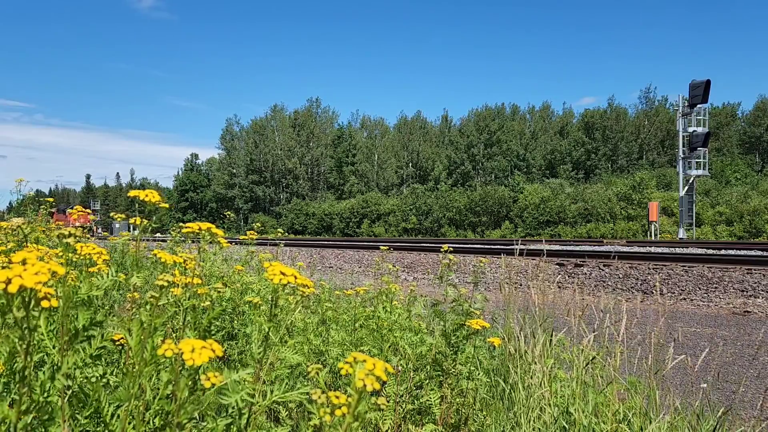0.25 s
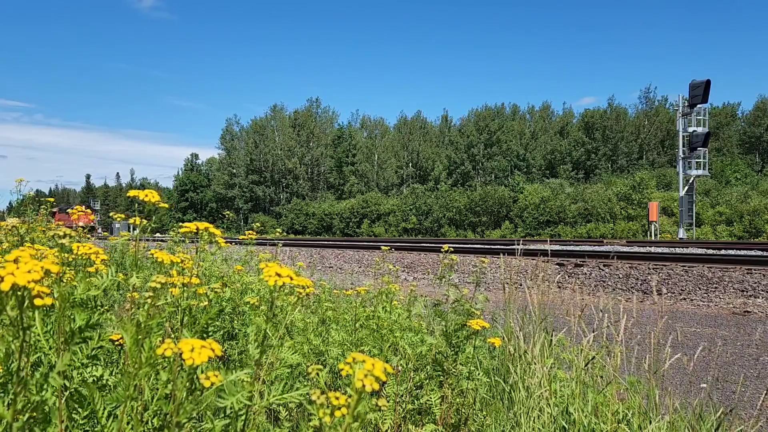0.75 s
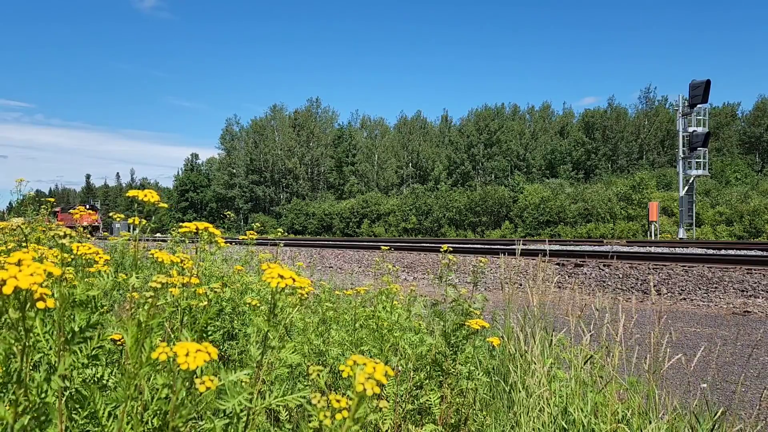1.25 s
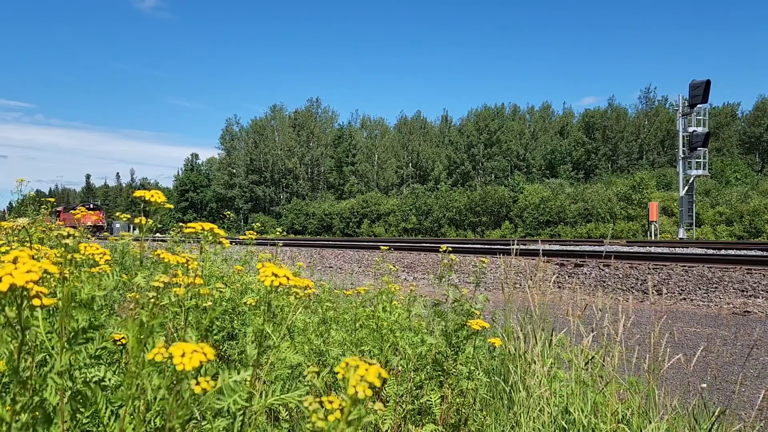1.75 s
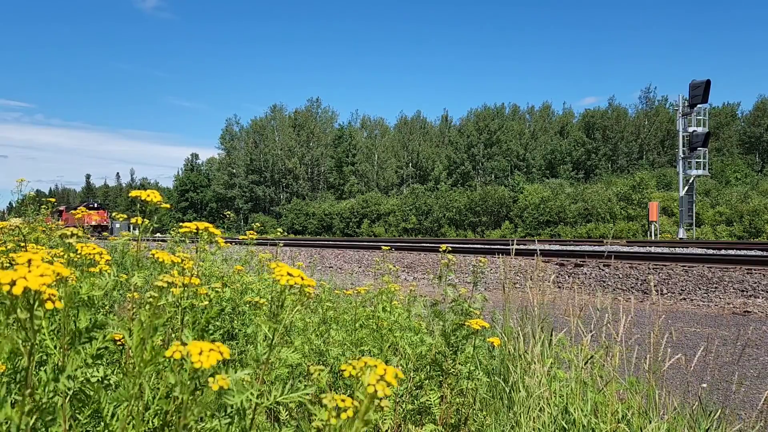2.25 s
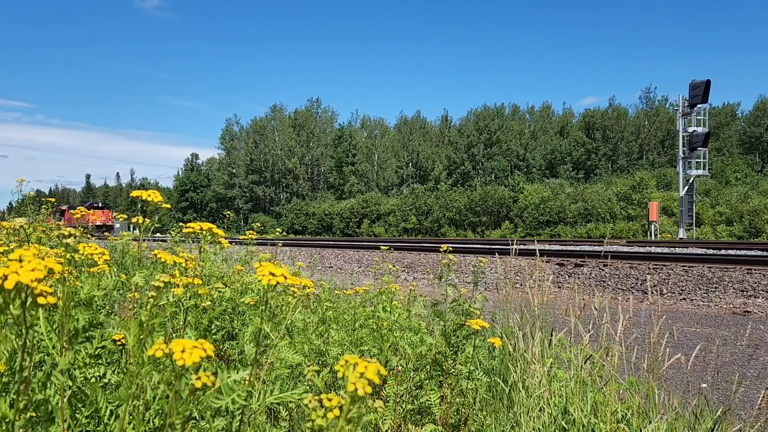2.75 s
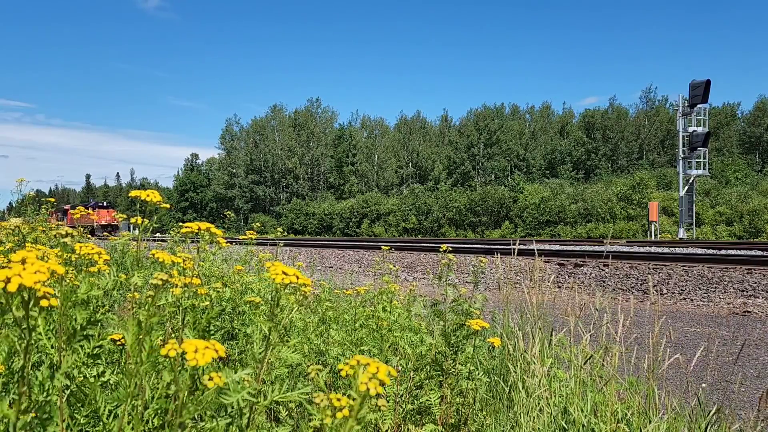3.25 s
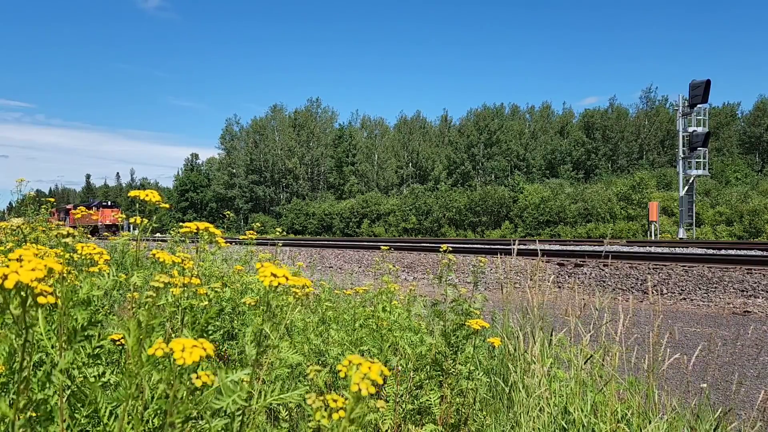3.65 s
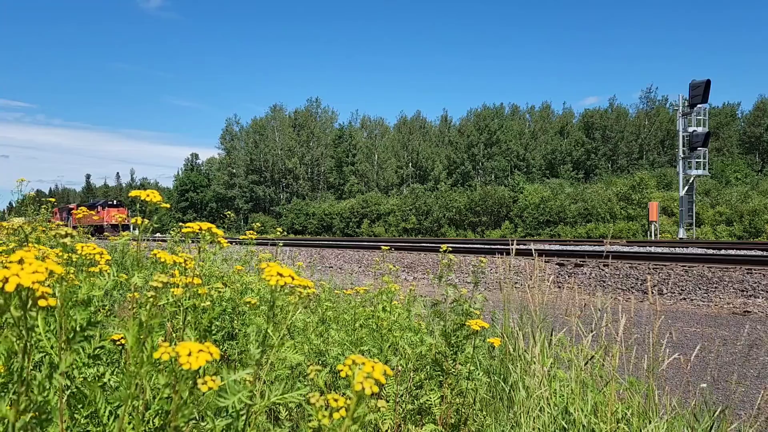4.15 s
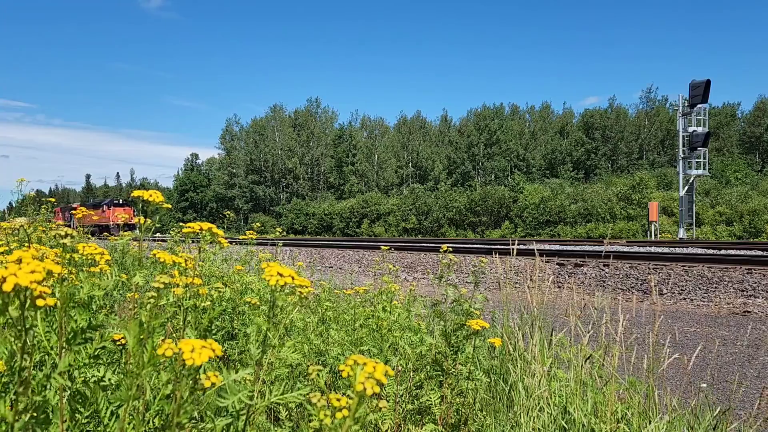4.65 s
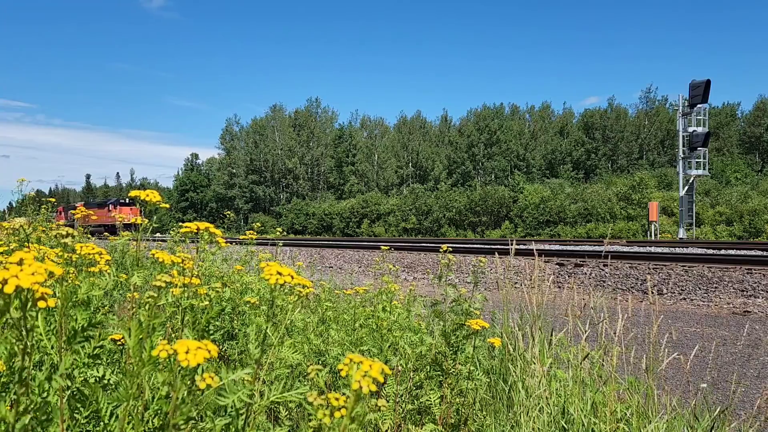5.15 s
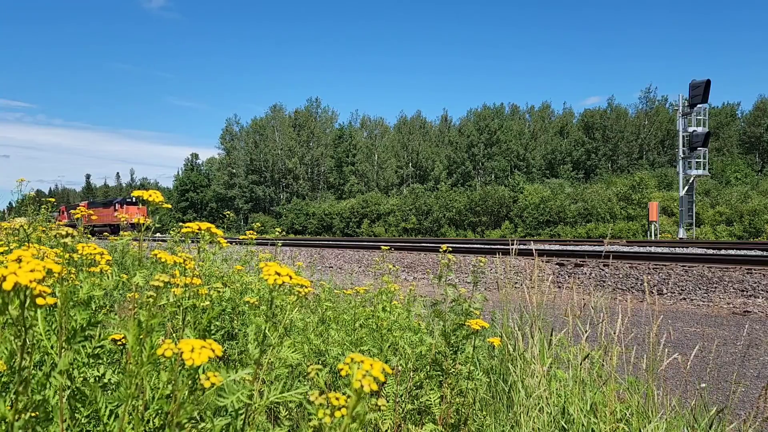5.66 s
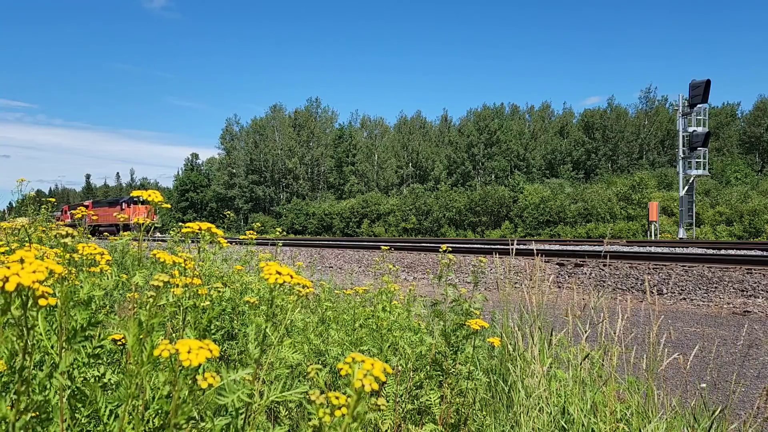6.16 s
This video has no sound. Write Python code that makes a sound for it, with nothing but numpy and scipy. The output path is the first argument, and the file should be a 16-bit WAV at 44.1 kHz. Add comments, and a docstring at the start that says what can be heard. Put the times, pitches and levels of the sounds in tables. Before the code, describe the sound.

A bell clangs steadily as a diesel freight train rumbles nearer across a buzzing insect meadow, then a loud sustained chord air horn blares.

```python
"""A bell rings and a chord air horn blows as a freight train draws near from the left across a summer meadow;
katydids buzz, crickets trill, and a wood beyond the track answers horn and bell.
Horn and bell are sums of partials that shimmer in warm air; two diesel locomotives are sums of crank orders
over coloured noise for wheels, rush and an air vent. Katydids are gated hiss, crickets short tones and
gated noise, and the wood's echo is a decaying noise tail."""
import sys
import numpy as np
from scipy import signal
from scipy.fft import rfft, irfft, next_fast_len
from scipy.io import wavfile
from scipy.ndimage import uniform_filter1d, map_coordinates

SR = 44100
rng = np.random.default_rng(int(sys.argv[2]) if len(sys.argv) > 2 else 0)


def gain_from_decibels(decibels):
    """Convert decibel values to linear amplitude factors."""
    exponent = np.asarray(decibels, float) / 20
    return 10 ** exponent


def file_out(sig):
    """Save sig as 16-bit WAV at sys.argv[1]."""
    # one column per channel
    cols = np.atleast_2d(sig).T
    # limit, then scale
    lim = np.clip(cols, -1, 1)
    pcm = np.round(lim * 32767).astype(np.int16)
    wavfile.write(sys.argv[1], SR, pcm)


N = 282240
T = np.arange(N) / SR


def unit(x):
    """Scaled to rms 1."""
    return x / np.sqrt(np.mean(x ** 2) + 1e-20)


def along(points, hz):
    """Interpolates (frequency [Hz], value) points on a log frequency axis."""
    f, v = np.transpose(points)
    return np.interp(np.log(hz + 1), np.log(f + 1), v)


def curves(rows):
    """One value per sample for each column after the time."""
    s, *cols = np.transpose(rows)
    return [np.interp(T, s, c) for c in cols]


def ramp(start, rise):
    """0 before start, 1 after the rise."""
    return np.clip((T - start) / rise, 0, 1)


def wobble(rate):
    """A smooth random curve, rate knots a second."""
    return map_coordinates(rng.standard_normal(int(N * rate / SR) + 4), [T * rate])


def filtered(x, response):
    """x times a complex response of frequency."""
    m = next_fast_len(N + 8192)
    return irfft(rfft(x, m) * response(np.fft.rfftfreq(m, 1 / SR)), m)[..., :N]


def noise(spectrum, alike):
    """Stereo noise of rms 1 whose channels share the power fraction alike."""
    common, *apart = rng.standard_normal((3, N))
    pair = np.sqrt(alike) * common + np.sqrt(1 - alike) * np.array(apart)
    return unit(filtered(pair, lambda hz: gain_from_decibels(along(spectrum, hz))))


def shimmer(x, low_db, high_db, own):
    """Eddies of warm air bend level and phase in drifting patches, more in the treble, partly apart at each port."""
    hz, _, z = signal.stft(x, SR, nperseg=1024)
    eddies = rng.standard_normal((2, 3) + z.shape)
    eddies = uniform_filter1d(eddies, size=7, axis=2)  # patches wide in frequency
    eddies = unit(uniform_filter1d(eddies, size=6, axis=3))  # and long in time
    bend, turn = eddies[:, :1] + own * eddies[:, 1:]
    depth = along([(300, low_db), (6000, high_db)], hz)[:, None] * np.log(10) / 20
    keep_power = depth ** 2 * (1 + own ** 2)
    bent = z * np.exp(depth * (bend + 1j * turn) - keep_power)
    return signal.istft(bent, SR, nperseg=1024)[1][:, :N]


def waver(pair, depth_s, rate):
    """The air path to each port stretches and shrinks on its own."""
    return np.array([map_coordinates(x, [(T + depth_s * wobble(rate)) * SR], mode="nearest") for x in pair])


def partials(phase, levels_db, onset):
    """A reed bell's harmonics, each swaying in level; the higher ones speak later in the onset."""
    tone = 0
    for k, db in enumerate(levels_db, 1):
        tone = tone + gain_from_decibels(db + 1.7 * wobble(9)) * onset ** (k - 1) * np.sin(k * phase)
    return tone


def brass(phase, pitch_hz, start_s):
    """The low bell's upper partials, with a brassy peak that moves in frequency."""
    # colour of the upper partials: (frequency [Hz], relative level [dB])
    colour = [(1650, 0), (2000, -3), (2300, -3.5), (2700, -8), (3300, -13), (4000, -15), (6000, -16),
              (7500, -10.5), (9000, -20), (11000, -27.5), (13000, -25)]
    # brassy peak: (time [s], centre [Hz], relative level of all upper partials [dB])
    glare = [(4.1, 4400, -2.5), (4.17, 4500, 1.5), (4.22, 4350, -1), (4.3, 4900, 1.5), (4.4, 4600, 0),
             (4.6, 4600, -1), (4.8, 5560, 2), (5.2, 5300, 0), (5.65, 5760, 2), (6.4, 5100, 1)]
    glare_hz, glare_db = curves(glare)
    scatter = rng.uniform(0, 2 * np.pi, 40)  # the long path over the ground shifts each partial
    tone = 0
    for k in range(5, 40):
        hz = k * pitch_hz
        peak_db = 5 * np.exp(-((hz - glare_hz) / 900) ** 2)
        tone = tone + gain_from_decibels(along(colour, hz) + peak_db) * np.sin(k * phase + scatter[k])
    return gain_from_decibels(-4.5 + glare_db) * tone * ramp(start_s, .09) ** 3


def sum_tones(low, mid, high):
    """The loud wave steepens, which adds tones at sums of the bells' pitches."""
    # high bell plus partials 1-6 of the low one: (relative level [dB])
    steepened = [-24.5, -19, -19, -23, -20, -26]
    tone = gain_from_decibels(-22.5) * np.sin(low + mid)
    for k, db in enumerate(steepened, 1):
        tone = tone + gain_from_decibels(db + wobble(7.9)) * np.sin(k * low + high)
    return tone


def squeaks():
    """Brief tones as the air arrives, each swelling and fading under half a sine."""
    # (start [s], length [s], frequency [Hz], relative level [dB])
    arrivals = [(3.969, 0.066, 568, -23.5), (3.977, 0.072, 770, -29)]
    tones = np.zeros(N)
    for s, length, hz, db in arrivals:
        swell = np.sin(np.pi * np.clip((T - s) / length, 0, 1))
        tones += gain_from_decibels(db) * swell * np.sin(2 * np.pi * hz * T)
    return tones


def horn():
    """Three strong reed bells and a weak one; the strong ones ride on each other's pressure, adding mixed tones."""
    # bells, low to high: (start [s], rise [s], settled pitch [Hz], excess at the start [Hz], relative level [dB])
    reed_bells = [(4.0, 0.04, 330.2, 15, -21), (3.98, 0.11, 465.5, 13, -25), (3.95, 0.091, 510.2, 5, -21)]
    # a fourth bell that barely speaks, same columns
    weak_bell = (4.03, .1, 736.5, 25.5, -40)
    # air pressure at the horn: (time [s], level [dB])
    air = [(4.0, -1.5), (4.3, -0.5), (4.6, 0.5), (4.9, -1), (5.3, 0.5), (5.7, -0.5), (6.0, -1.5), (6.4, -3)]
    # how far each bell yields to the others' pressure: (factor [1])
    rides = [1.5, .9, 0.7]
    # partials 1, 2, 3.. of each bell: (relative level [dB])
    low_partials = [-2, 1.5, -0.5, -2.5]
    mid_partials = [-0.5, -12.5, -9.5, -11, -18, -18, -56, -85, -23, -15]
    high_partials = [-0.5, -11.5, -13.5, -19, -28, -29.5, -41, -70, -43, -90]
    # the high bell wanders: (time [s], level [dB], left minus right [dB])
    high_drift = [(4.0, -3.5, 0), (4.5, -0.5, -5), (4.85, 0, 8), (5.15, -0.5, -13.5), (5.6, -2, -18),
                  (6.1, 4, -9.5), (6.4, 6.5, -2)]
    settle_s = .17  # time constant of the pitch sag as the air pressure settles

    start, rise, settled_hz, excess_hz, bell_db = np.transpose(reed_bells)[:, :, None]
    pitches = settled_hz + excess_hz * np.exp(-np.maximum(T - start[0], 0) / settle_s)
    flutter = 1 + .0011 * np.array([wobble(60) for _ in pitches])
    phases = 2 * np.pi * np.cumsum(pitches * flutter, 1) / SR

    # pressure of each bell, felt by the other two
    push = np.array([.8 * np.sin(phases[0]) + 1.6 * np.sin(2 * phases[0]),
                     .4 * np.sin(phases[1]),
                     .8 * np.sin(phases[2])])
    ride_s = 1.8e-5 * ramp(4, .3) * np.c_[rides] * (sum(push) - push)
    low, mid, high = phases + 2 * np.pi * pitches * ride_s

    onset = ramp(start, rise)
    strength = gain_from_decibels(bell_db + curves(air)[0]) * onset
    low_tone = partials(low, low_partials, ramp(start[0], .11) ** 0.57) + brass(low, pitches[0], start[0])
    centre = strength[0] * low_tone + strength[1] * partials(mid, mid_partials, onset[1])
    centre = centre + squeaks()
    centre = centre + strength[0] * ramp(start[0], 0.24) * sum_tones(low, mid, high)

    s, rise_s, hz, excess, db = weak_bell
    weak_hz = hz + excess * np.exp(-np.maximum(T - s, 0) / settle_s) + 2.5 * wobble(40)
    weak = 2 * np.pi * np.cumsum(weak_hz) / SR
    centre = centre + gain_from_decibels(db) * ramp(s, rise_s) * partials(weak, [0, -1, -8], 1)

    high_db, high_pan = curves(high_drift)
    high_tone = gain_from_decibels(high_db) * strength[2] * partials(high, high_partials, onset[2])
    breath = gain_from_decibels(-30) * centre * wobble(5000)  # air leaking past the reeds
    ports = gain_from_decibels(np.array([high_pan, -high_pan]) / 2)
    middle = shimmer(centre + breath, 0.96, 2.21, own=1.95)
    wandering = ports * shimmer(high_tone, 0.59, 2.3, own=1.93)
    return waver(np.sqrt(2) * (middle + wandering), 1.6e-5, 45)


def bell():
    """Each of the even strokes rings the bronze modes at new strengths, louder stroke by stroke."""
    # bell modes: (frequency [Hz], relative level [dB], time to fall 60 dB [s])
    bronze = [(824, -57, 3), (1432, -58, 2.5), (1631, -47.5, 4.5), (1782, -46, 4.5), (2896, -44, 2),
              (3682, -60, .9), (4242, -57, 1.6), (4330, -62, .9), (4800, -63, .6), (5706, -60, .7),
              (5790, -63, .6), (7187, -68, .4)]
    first_s, stroke_s = -.14, .7965
    first_db, grows_db = 1.5, 1  # gain of the first stroke, growth a stroke
    ring = np.zeros(N)
    for k in range(9):
        t = np.maximum(T - first_s - k * stroke_s, 0)
        bloom = 1 - np.exp(-t / .02)
        for hz, db, t60 in bronze:
            mode_db = first_db + k * grows_db + db + rng.normal(0, 1) - 60 * t / t60
            ring += gain_from_decibels(mode_db) * bloom * np.sin(2 * np.pi * hz * t)
    return waver(shimmer(ring, .7, 1.1, own=1.8), 6e-5, 60)


def engine(speed, throb, orders):
    """Uneven cylinders sound the orders around the sixteenth; they line up once a cycle, spread out by the exhaust,
    and turn over above the resonance of the stack."""
    start, tone, spread, stack = throb
    crank = start + np.cumsum(curves(speed)[0]) / SR
    sound = 0
    for k, db in orders.items():
        sway_db = .6 * wobble(1.5) + 1.1 * wobble(2) * np.array([[1], [-1]])
        turns = k * crank + tone + spread * (k - 16) ** 2 + (k > stack) / 2
        sound = sound + np.sqrt(2) * gain_from_decibels(db + sway_db) * np.cos(2 * np.pi * turns)
    return sound


def engines():
    """The lead locomotive steadily nears; the second swells as it clears the trees."""
    # crank speed: (time [s], speed [cycles/s])
    lead_speed = [(0, 5.075), (3.0, 5.075), (3.5, 5.088), (6.4, 5.087)]
    second_speed = [(0, 3.735), (3.0, 3.735), (3.8, 3.723), (6.4, 3.727)]
    # exhaust throb: (start [cycles], tone phase [turns], spread [turns], stack resonance [order])
    lead_throb = (-.015, .66, -.08, 18)
    second_throb = (.11, .07, -.17, 24)
    # orders of the crank cycle: (multiple [1], relative level [dB])
    lead_orders = {8: -4, 9: -16, 11: -10, 12: -11, 13: -14, 14: -14, 15: 2, 16: 0, 17: 1, 19: -6}
    second_orders = {8: -14, 13: -10, 14: -11, 15: 1, 16: 0, 17: -5, 19: -4, 29: -12}
    # lead engine: (level at 0 s [dB], growth [dB/s])
    lead_nears = (-33.5, 0.86)
    # second engine: (time [s], level [dB])
    second_clears = [(0, -68), (.8, -61), (1.4, -37), (2.0, -28.5), (2.6, -32), (6.4, -34.5)]
    lead = gain_from_decibels(nearing(lead_nears)) * engine(lead_speed, lead_throb, lead_orders)
    return lead + gain_from_decibels(curves(second_clears)[0]) * engine(second_speed, second_throb, second_orders)


def nearing(approach):
    """A level that grows evenly in dB as the train draws near."""
    db, db_per_s = approach
    return db + db_per_s * T


def wheels_and_rush():
    """The rumble of wheels and the rush of rails and fans: two swaying bands of noise."""
    # noise spectra: (frequency [Hz], relative density [dB])
    rumble = [(15, -41), (25, -45), (64, -4.5), (88, 2), (112, -11), (151, -17.5), (270, -27.5), (400, -53),
              (520, -68), (880, -120)]
    rush = [(150, -42), (250, -7), (380, -6), (830, -6), (1150, -14), (1600, -7.5), (2300, -15),
            (4000, -22), (6500, -25.5), (8600, -18.5), (10000, -26), (13000, -46)]
    # approach: (level at 0 s [dB], growth [dB/s])
    rumble_nears = (-33.5, 0.45)
    rush_nears = (-47, 0.81)
    rolling = gain_from_decibels(nearing(rumble_nears) + 1.2 * wobble(2.4)) * noise(rumble, .95)
    return rolling + gain_from_decibels(nearing(rush_nears) + 0.66 * wobble(6.03)) * noise(rush, 0.47)


def air_vent():
    """An air valve vents: a burst of hiss that holds, then falls away."""
    # hiss spectrum: (frequency [Hz], relative density [dB])
    vent = [(1200, -11), (2500, -4.5), (4000, -4), (6500, -7), (8500, -15)]
    start_s, rise_s, hold_s = 0.66, 0.022, 0.18  # the hold includes the rise
    fall_db = 66 * np.maximum(T - start_s - hold_s, 0)
    return gain_from_decibels(-42.5 - fall_db) * ramp(start_s, rise_s) * noise(vent, 0.4)


def train():
    """Two engines over the rumble and rush, with one vent of air."""
    return engines() + wheels_and_rush() + air_vent()


def katydids():
    """Wing strokes gate a very high hiss: a near insect on the left, a faster one, and a steady far chorus."""
    # katydid hiss spectrum: (frequency [Hz], relative level [dB])
    hiss = [(8000, -52), (9500, -20), (11000, -10), (12400, -3.5), (13100, 3), (14500, 4), (15300, 13),
            (16000, -23), (17000, 3)]
    pan = 10 + 0.96 * wobble(2.94)  # left minus right, dB

    def stroke(cycles, sharp):
        return np.exp(sharp * (np.cos(2 * np.pi * cycles) - 1))

    near = stroke(104.8 * T + .3 * wobble(2) + .03 * wobble(50), 7) * gain_from_decibels(1.2 * wobble(60))
    forth, back = stroke(109.5 * T, 8), stroke(109.5 * T + .5, 8)
    other = (forth + 0.68 * back) * gain_from_decibels(-3 + 1.9 * wobble(3.7))
    white = [(100, 0)]
    buzz = near * noise(white, 0.79) + other * noise(white, 0.41) + 0.46 * noise(white, 0.13)
    buzz = unit(filtered(buzz, lambda hz: gain_from_decibels(along(hiss, hz))))
    return gain_from_decibels(-34.5 + 0.51 * wobble(1.37) + np.array([pan, -pan]) / 2) * buzz


def near_cricket():
    """Trills evenly spaced short chirps that sag in pitch, in phrases of unequal length."""
    # phrases: (start [s], chirps [count], relative peak level [dB])
    phrases = [(-.003, 8, -48), (.637, 21, -47), (2.062, 14, -48), (3.243, 11, -49)]
    u = np.linspace(0, 1, round(0.0164 * SR))
    chirp = np.sin(np.pi * u) * np.sin(2 * np.pi * np.cumsum(8800 * (1 - 0.1 * u ** 2.5)) / SR)
    trill = np.zeros(N + 2 * SR)  # a second to spare at each end
    for start, count, db in phrases:
        for s in start + .0586 * np.arange(count):
            trill[SR + round(s * SR):][:len(u)] += gain_from_decibels(db + rng.normal(0, 1)) * chirp
    trill = trill[SR:][:N] * (1 + .25 * wobble(660))
    return gain_from_decibels(-1.0) * trill * gain_from_decibels([[2.5], [-2.5]])


def far_cricket():
    """A lower, farther cricket: narrow noise gated into blurred groups of three pulses."""
    # groups: (start [s], relative level [dB])
    groups = [(.02, -57), (.32, -57), (.52, -61), (.8, -54), (1.05, -58), (1.27, -62), (1.48, -56),
              (1.86, -59), (2.42, -58), (2.72, -61), (3.2, -57), (3.64, -62), (3.88, -57.5)]
    length_s, pulses_per_s = 0.12, 22.4
    gate = np.zeros(N)
    for s, db in groups:
        pulses = np.sin(np.pi * pulses_per_s * (T - s)) ** 2
        gate += gain_from_decibels(db) * pulses * (T > s) * (T < s + length_s)
    band = [(4900, -40), (5200, -1), (5320, 0), (5450, 1), (5750, -40)]
    return gate * gain_from_decibels(1.5 * wobble(25)) * noise(band, 0.39)


def wood(x):
    """The tree line scatters a late, dull echo."""
    t = np.arange(SR) / SR
    fall = gain_from_decibels(-60 * t / 2.1)  # 60 dB in 2.1 s
    tail = rng.standard_normal((2, SR)) * fall * (1 - np.exp(-t / 0.16))
    echo = signal.fftconvolve(x, tail / np.linalg.norm(tail[0]), axes=1)[:, :N]
    return filtered(echo, lambda hz: 1 / (1 + (hz / 2500) ** 2))


def scene():
    """Everything reaches the left port first, as from the left; the wood answers horn and bell."""
    lead_s = .0002
    tones = horn() + bell()
    field = tones + train() + katydids() + near_cricket() + far_cricket() + gain_from_decibels(-8) * wood(tones)
    return filtered(field, lambda hz: np.exp(1j * np.pi * hz * lead_s * np.array([[1], [-1]])))


def roll_off(x):
    """The treble ends steeply here."""
    return signal.sosfilt(signal.butter(12, 16220, fs=SR, output="sos"), x)


def record(dry):
    """The preamplifier rounds off the highest peaks."""
    ceiling, knee = 1.2, 5  # full scale is 1; a higher knee bends more sharply
    rounded = dry / (1 + np.abs(dry / ceiling) ** knee) ** (1 / knee)
    return roll_off(rounded)


dry = scene()
out = record(dry)
file_out(out)
```